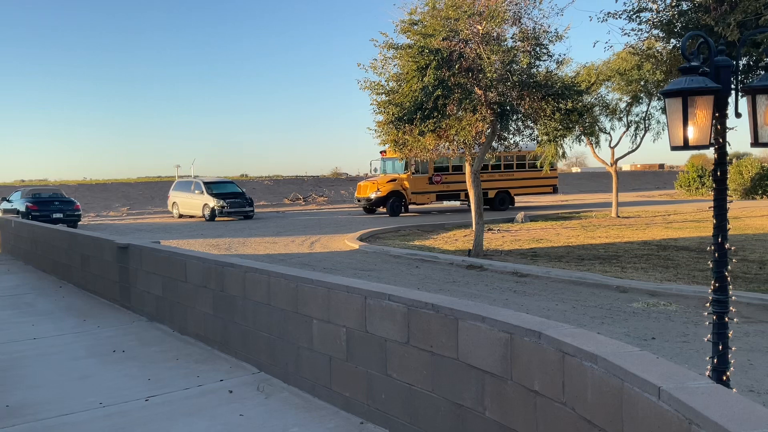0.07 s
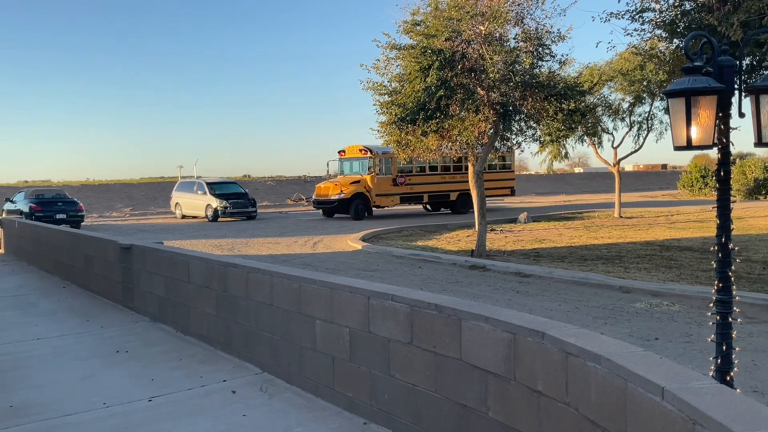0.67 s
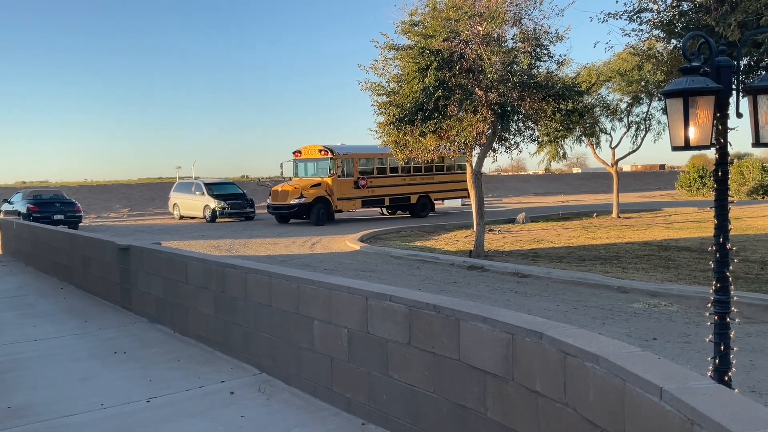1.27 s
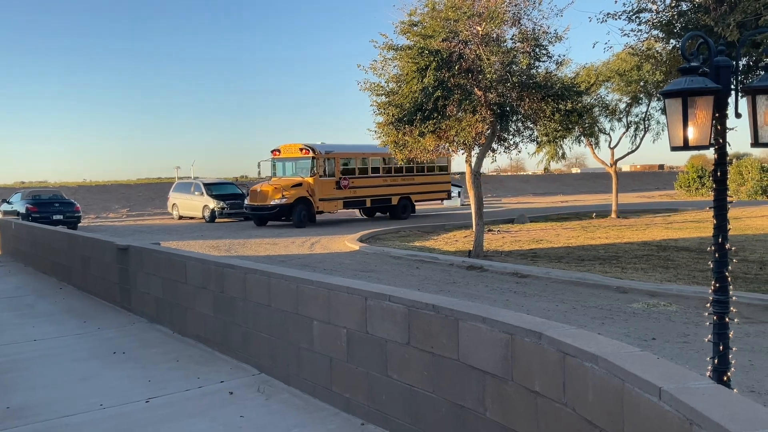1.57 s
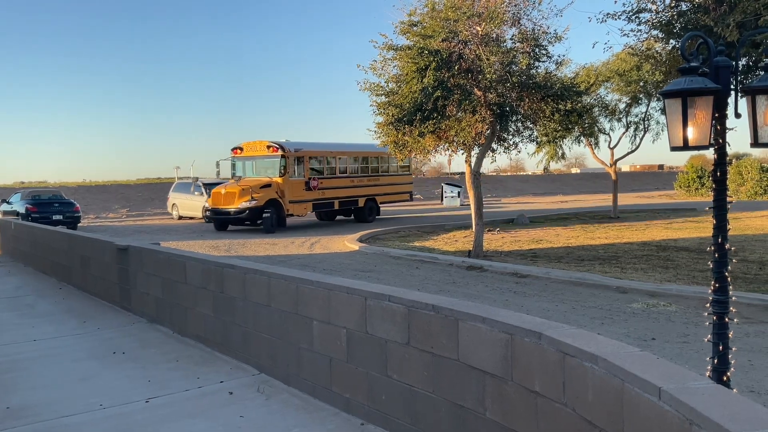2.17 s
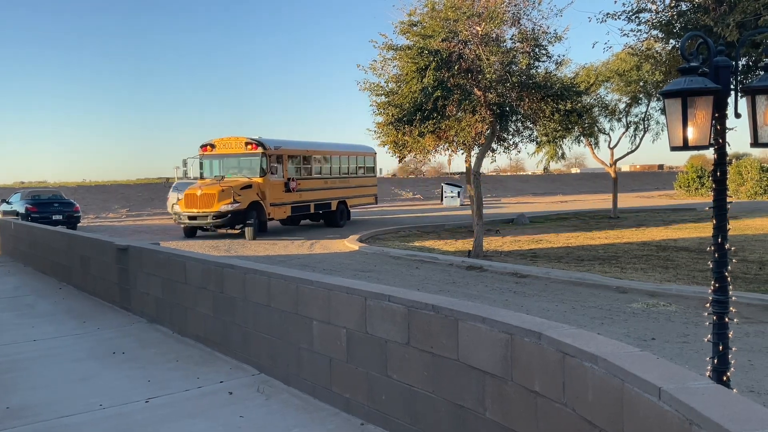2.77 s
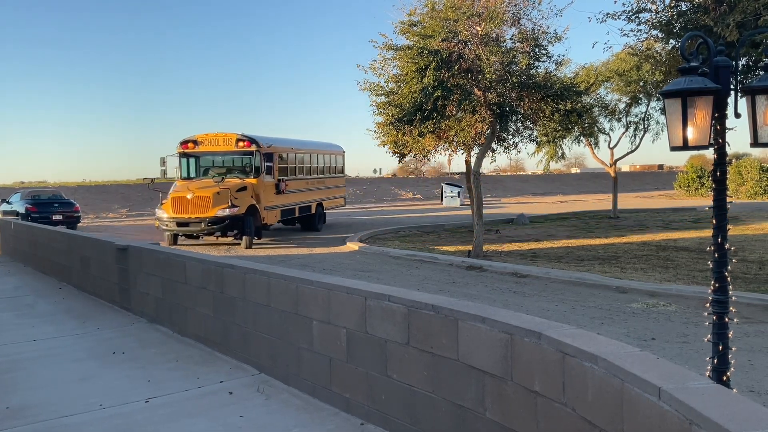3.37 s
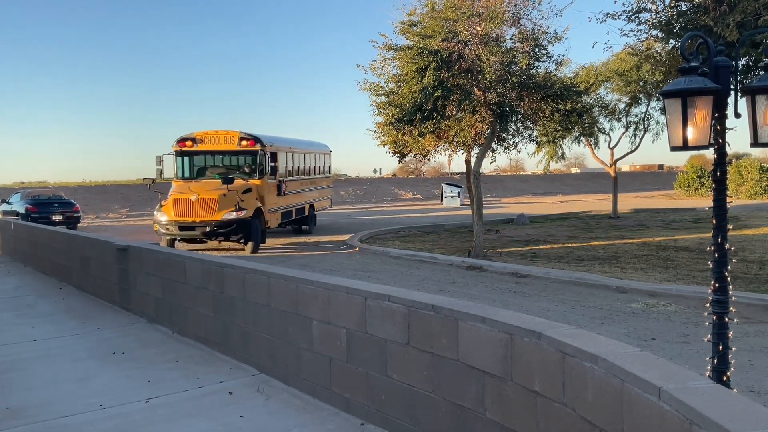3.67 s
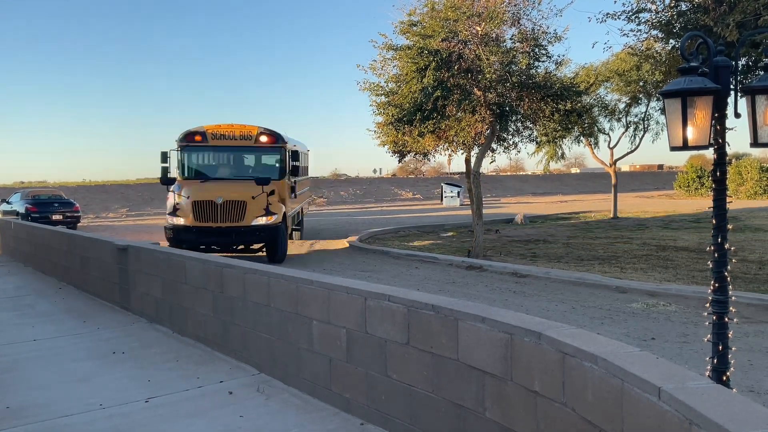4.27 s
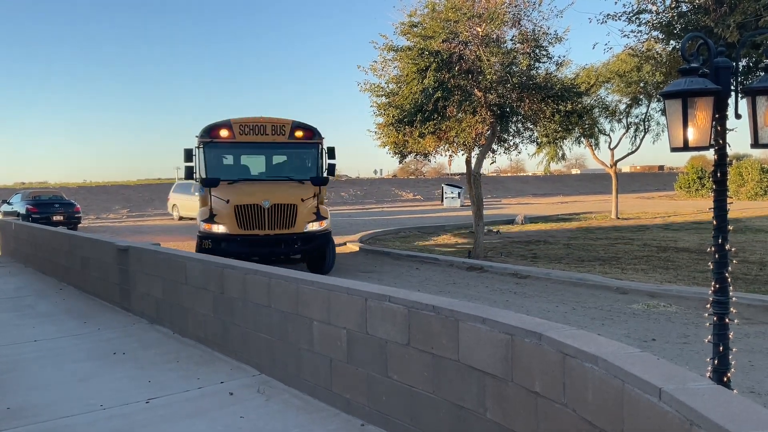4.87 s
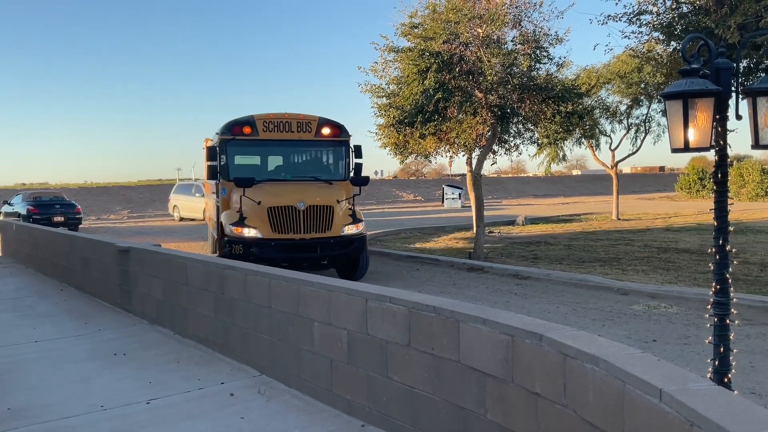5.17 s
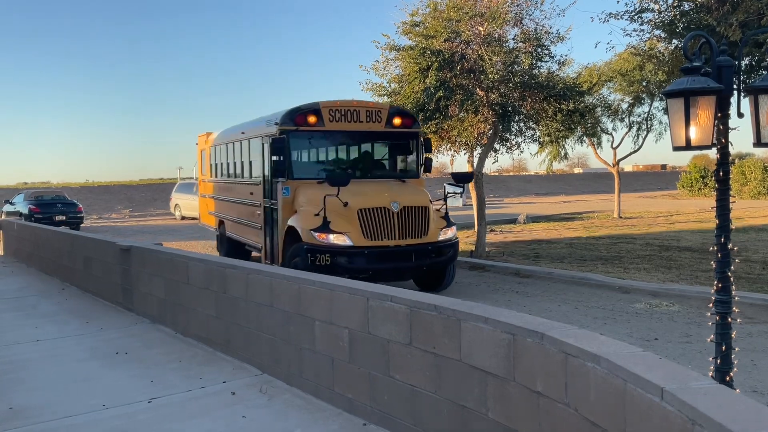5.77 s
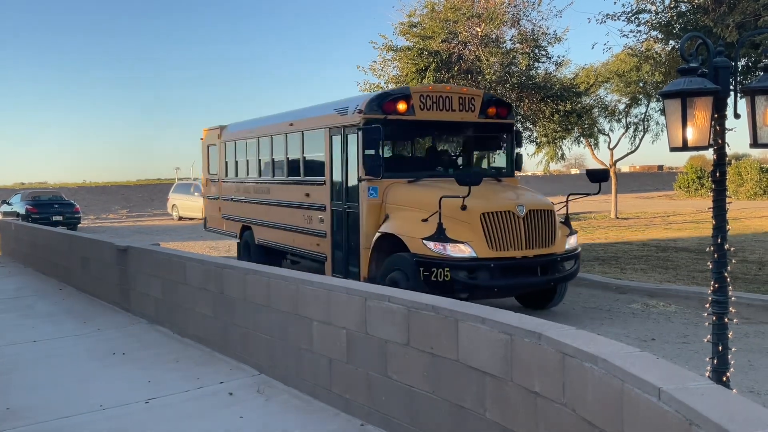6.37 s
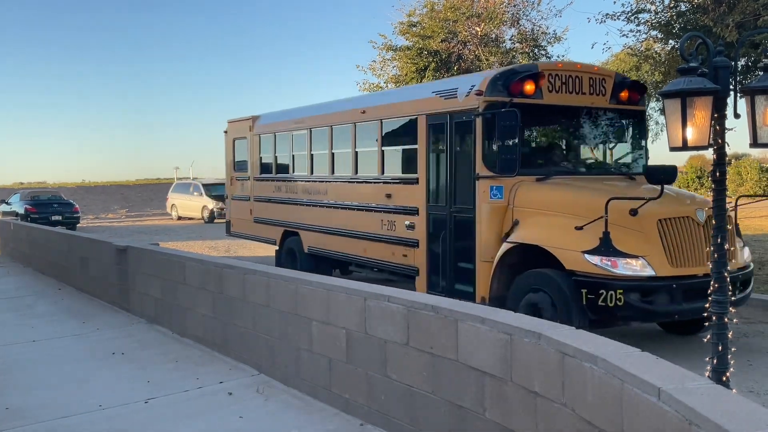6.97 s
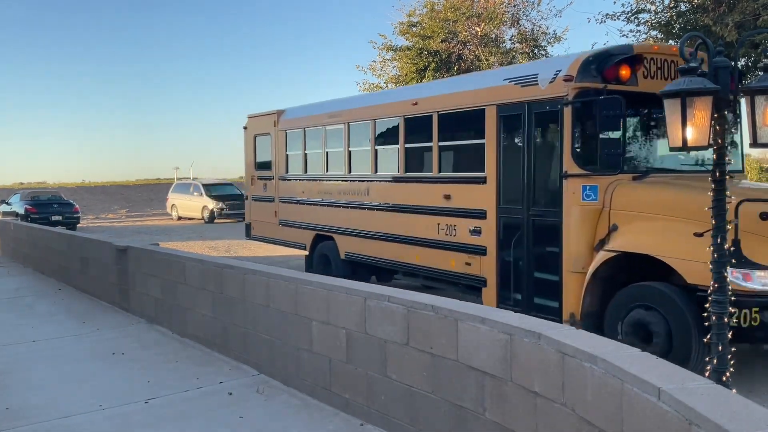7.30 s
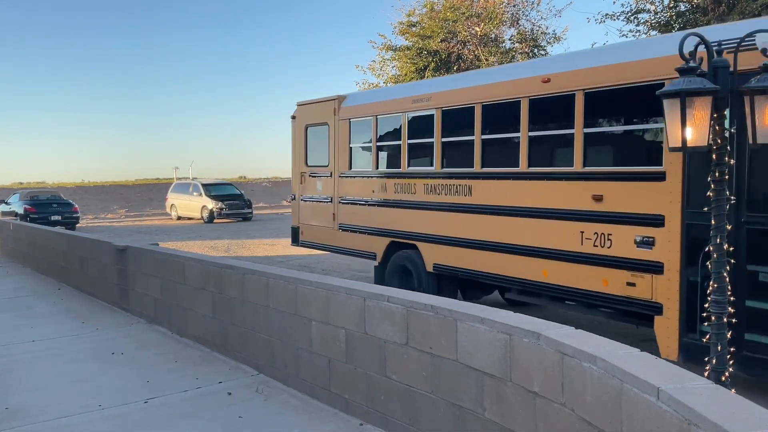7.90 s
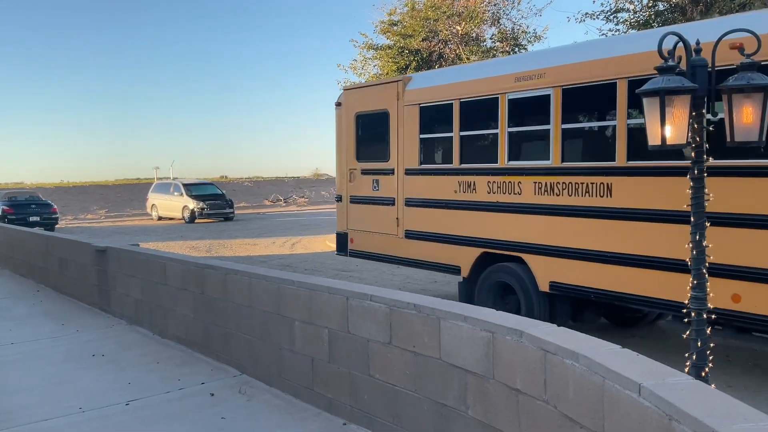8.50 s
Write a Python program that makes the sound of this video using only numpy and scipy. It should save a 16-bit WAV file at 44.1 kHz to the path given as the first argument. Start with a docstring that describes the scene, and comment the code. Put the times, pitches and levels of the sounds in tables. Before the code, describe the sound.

Heard from a fixed outdoor spot, a bus engine starts some way off, with an even diesel clatter, thin metallic pings and a rumbling exhaust. It rolls slowly nearer without revving. Midway the exhaust briefly surges and the knocking hardens. Then faint whines, a thin hiss, loose clanks and tiny snaps of grit join the swelling rattle as the bus passes a few metres from the stereo microphone.

```python
"""A six-cylinder diesel school bus rolls up a driveway at idle, passing 5.4 m from a stereo microphone pair.
Each firing knocks the block and rattles the injection gear, every second one rings the fuel pump; the exhaust
drones and rumbles underneath. Faint hums and gliding whines ride on the engine, loose fittings clank, a little
grit snaps under the tyres, and two moving ground-reflection notches hollow the sound."""
import sys
import numpy as np
from scipy import signal
from scipy.fft import rfft, irfft, next_fast_len
from scipy.io import wavfile

SR = 44100
rng = np.random.default_rng(int(sys.argv[2]) if len(sys.argv) > 2 else 0)


def transcribe(u):
    """Save the signal u as a 16-bit wav file named by the first command-line argument.

    u: samples, shape (n,) or (channels, n), limited to [-1, 1]; the rate is SR.
    q: integer samples, one column per channel.
    """
    v = np.clip(np.atleast_2d(u).T, -1, 1)
    q = np.round(v * 32767).astype(np.int16)
    wavfile.write(sys.argv[1], SR, q)


N = 381024
TIME = np.arange(N) / SR
SPEED_M_PER_S, NEAREST_M, NEAREST_S = 2.774, 5.38, 8.18   # the engine's pass by the microphones
TURN_START_S, TURN_END_S = 4.94, 8   # the bus swings from head-on to side-on

# cylinders in firing order: knock/dB, clatter/dB, pump/dB
CYLINDERS = [(-1.2, -.2, -1), (0, -1.3, -9), (-.5, 1.3, 0), (0, -.5, -8), (.5, 1.3, 0), (.5, -1.3, -9)]
KNOCK_DB, CLATTER_DB, PUMP_DB = np.transpose(CYLINDERS)


def combustion(crank, near_db, side, screen_db):
    """Each firing knocks the block, rings the housing and drums the body panels."""
    # resonances of each part: f/Hz, relative level/dB
    block_spectrum = [(600, -19), (780, -9.5), (860, -5), (1010, 3), (1130, 2), (1290, 2), (1420, 1),
                      (1600, -2), (2000, -2), (2300, -6), (2700, -5.5), (3600, -37.5)]
    housing_spectrum = [(420, -25.5), (510, -5.5), (570, 3), (630, 2.5), (740, 2), (850, -1), (1100, -34)]
    panel_spectrum = [(150, -23), (205, -0.5), (255, 1.5), (295, -1.5), (345, 0.5), (400, -1), (440, 2.5),
                      (490, 1.5), (580, -24.5)]
    thuds = firings(crank, KNOCK_DB, rise_s=.00038, decay_s=.0064, bed=.72,
                    uneven_db=.5, repeat=.53, grain_db=0)
    # close by, echoes from the road and the underbody fill the gaps between knocks
    knocks = firings(crank, KNOCK_DB, rise_s=.0016, decay_s=.011, bed=.4 + .04 * side,
                     uneven_db=.7, repeat=.4, grain_db=.5)
    recede_db = swell(at_s=5.4, half_s=.4, db=-1.7)   # while the hard knocks take over
    block = from_db(-28.5 + near_db + recede_db) * colour(knocks, block_spectrum)
    # the housing sounds forwards and fades once the nose has gone by
    gone_by_db = 2 * np.maximum(TIME - NEAREST_S, 0)
    housing_db = -35 + .84 * near_db - gone_by_db + screen_db / 2
    housing = from_db(housing_db) * colour(knocks + thuds, housing_spectrum)
    # the panels carry from afar, and drum louder side-on
    panels = from_db(-46 + 9 * side + screen_db / 2) * colour(thuds, panel_spectrum)
    return block + housing + panels


def valves(crank, near_db, screen_db):
    """The valves clatter as they seat, just ahead of each firing."""
    # valve gear resonances: f/Hz, relative level/dB
    spectrum = [(1700, -27), (2200, 2), (2650, 7), (3000, 3.5), (3400, -1.5), (3900, -15)]
    seatings = firings(crank + .09, KNOCK_DB, rise_s=.0075, decay_s=.0084, bed=.25,
                       uneven_db=1.8, repeat=.42, grain_db=1.2)
    return from_db(-32.5 + .95 * near_db + screen_db) * colour(seatings, spectrum)


def injectors(crank, near_db, side, screen_db):
    """The injection gear gives a bright rattle with each firing."""
    # injector resonances: f/Hz, relative level/dB
    spectrum = [(3000, -16), (3600, -2), (3980, 1), (4400, -0.5), (5200, -0.5), (5800, -3), (6250, -1.5),
                (6900, -9.5), (7800, -20)]
    rattle = firings(crank + .05, CLATTER_DB, rise_s=.006, decay_s=.013, bed=.2 + .02 * side,
                     uneven_db=1.1, repeat=.3, grain_db=.9)
    return from_db(-35.5 + .82 * near_db + screen_db) * colour(rattle, spectrum)


def fuel_pump(crank, near_db, side, screen_db):
    """The pump rings in narrow bands, tapped harder on every second firing."""
    # pump resonances: f/Hz, relative level/dB
    spectrum = [(3000, -25.5), (3700, -37), (3920, 19), (4060, -2), (4300, -2), (5000, -60), (5900, 11),
                (6250, -16), (6600, -26), (8000, -49)]
    taps = firings(crank - .02, PUMP_DB, rise_s=.0023, decay_s=.016, bed=.04 + .18 * side,
                   uneven_db=1, repeat=.19, grain_db=1.5)
    return from_db(-45.5 + .93 * near_db + screen_db) * colour(taps, spectrum)


def sizzle(crank, near_db):
    """A thin, flickering hiss swells as the engine nears the microphones."""
    # colour of the hiss: f/Hz, relative level/dB
    spectrum = [(6000, -12), (7400, 3), (8600, 0), (10000, -6), (11400, 1.5), (12500, 1), (14000, -3),
                (15500, -8)]
    hiss = firings(crank, CLATTER_DB, rise_s=.0022, decay_s=.0066, bed=1.1,
                   uneven_db=2, repeat=0, grain_db=2)
    return from_db(-53.5 + 1.2 * near_db + .94 * drift(21)) * colour(hiss, spectrum)


def hard_knocks():
    """Harder blows, single or in short runs, ring the modes of the block."""
    # blows: t/s, level/dB, run length/s
    blows = [(1.469, -32, 0), (4.975, -29.5, 0), (5.056, -21, 0), (5.113, -32, 0), (5.169, -27.5, 0),
             (5.226, -25, .12), (5.397, -24.5, .12), (5.568, -28, 0), (5.624, -26, .06), (5.736, -30, 0),
             (5.849, -28, .06), (5.969, -27, 0), (7.556, -19.5, 0), (7.762, -22, 0), (7.783, -22, 0),
             (7.873, -22.5, .06), (7.986, -21, .06), (8.101, -21, .06)]
    # block modes: f/Hz, relative level/dB, decay/s
    modes = [(880, -10, .004), (1190, -11, .006), (1275, 0, .0085), (1400, -10, .005), (1620, -11, .004),
             (2950, -11, .002), (4900, -12, .003)]
    return ring(runs(blows), modes)


def pump_pings(rise_s=.0025, decay_s=.015, detune=.014, uneven_db=1.5, gain_db=.8):
    """The pump and its pipes shiver briefly in clusters of close modes, a little different each time."""
    # louder pings: t/s, relative level/dB, run length/s
    pings = [(.238, -41, 0), (.318, -41, 0), (.509, -38.5, 0), (.57, -43, .12), (.793, -41.5, .06),
             (1.132, -41, 0), (1.187, -39, 0), (1.357, -38, 0), (1.47, -36, 0), (1.527, -40.5, .06),
             (1.64, -38, 0), (1.696, -41, 0), (1.752, -36, 0), (1.81, -35.5, 0), (1.866, -41.5, 0),
             (1.923, -38, .06), (2.047, -41, 0), (2.094, -37.5, 0), (2.266, -38, 0), (2.493, -39, 0),
             (2.604, -35.5, 0), (2.658, -35, 0), (2.893, -39, 0), (3.224, -41, 0), (3.339, -37, 0),
             (3.451, -35, 0), (3.794, -37, 0), (5.993, -33, 0), (6.333, -33, 0), (7.186, -30.5, .06),
             (7.355, -29.5, 0), (7.868, -30.5, 0), (8.152, -30.5, 0), (8.381, -28.5, 0), (8.553, -27.5, 0)]
    # mode clusters: f/Hz, width/Hz, relative level/dB
    bands = [(3200, 400, -11), (4010, 150, -2), (5200, 650, -9), (6170, 280, -5.5)]
    out, age = np.zeros(N + SR), TIME[:SR // 10]
    envelope = (1 - np.exp(-age / rise_s)) * np.exp(-age / decay_s)
    bins_hz = np.arange(len(age) // 2 + 1) * SR / len(age)
    hz, width_hz, band_db = np.transpose(bands)[:, :, None]
    for s, db in runs(pings):
        centre_hz = hz * (1 + detune * rng.standard_normal(hz.shape))
        phases = np.exp(2j * np.pi * rng.random((len(hz), len(bins_hz))))
        clusters = irfft(np.exp(-((bins_hz - centre_hz) / width_hz) ** 2) * phases, len(age))
        clusters /= clusters.std(axis=1, keepdims=True)
        strength = from_db(db + gain_db + band_db + uneven_db * rng.standard_normal(hz.shape))
        start = round(s * SR)
        out[start:start + len(age)] += (strength * clusters).sum(0) * envelope
    return direct_only(out[:N])


def exhaust(crank, near_db):
    """Low firing orders waver over a turbulent rumble and a boom that pulses with the firings."""
    # drone, shifting as the tailpipe turns: t/s, level of order 2/dB, level of order 4/dB
    drone_levels = [(0, -43.5, -50), (1.2, -43.5, -46.5), (2.5, -48.5, -41), (3.6, -40, -44),
                    (4.8, -44.5, -45), (6, -44.5, -44), (7.2, -47, -41.5), (7.8, -37.5, -45),
                    (8.64, -41, -54)]
    # boom, stronger once the bus has turned in: t/s, level/dB
    boom_levels = [(0, -47), (3.55, -45.5), (3.75, -40), (4.45, -41.5), (5.08, -47), (5.25, -38),
                   (5.75, -38), (6.1, -42), (6.6, -39), (8.64, -40)]
    # colours of rumble and boom: f/Hz, relative level/dB
    rumble_spectrum = [(25, -47), (30, -29), (35.5, 1), (43, -28), (55, 4.5), (68, 0), (85, -0.5), (118, 0),
                       (130, -3.5), (160, -3), (190, -8), (240, -23.5)]
    boom_spectrum = [(75, -17), (88, 2.5), (100, 0), (116, 2.5), (128, -1.5), (150, -17)]
    surge_db = swell(at_s=5.21, half_s=.055, db=6)
    second_db, fourth_db = in_time(drone_levels)
    drone = 0
    for order, db in (1, -48 + .33 * near_db), (2, second_db + surge_db), (4, fourth_db):
        amplitude = np.sqrt(2) * from_db(db + 2.56 * drift(2.5))
        drone += amplitude * np.sin(2 * np.pi * order * crank + .65 * drift(4.9))
    turbulence = rng.standard_normal((2, N))
    rumble = from_db(-36.5 + .23 * near_db + surge_db) * colour(turbulence, rumble_spectrum)
    puffs = rng.standard_normal((2, N)) * (1 + .98 * np.cos(2 * np.pi * crank))
    boom = from_db(in_time(boom_levels)[0]) * colour(puffs, boom_spectrum)
    return rumble + boom + direct_only(drone)


def hums(near_db):
    """Resonances grow with nearness and swell while the turning bus beams them at the microphones."""
    # resonances: f/Hz, width/Hz, steady share, base level/dB, share of the distance loss
    modes = [(321.5, 14.7, 0.44, -55.5, 0.0098), (349, 15, 0, -52.5, 0.77), (528.4, 6.7, 0.56, -49, 0.86),
             (649, 7, 0.85, -47.5, 0.36), (902, 48, 0.04, -44, 0.72), (1255, 31, 0, -40.5, 1.8)]
    # swells and dips of the hum within 6 % of f: f/Hz, t/s, half length/s, gain/dB
    beams = [(320, 1.85, .25, 6), (320, 3.05, .75, 9), (320, 4.35, .3, 5.5), (320, 8.2, 1.25, 18.5),
             (352, 7.04, 0.63, 12.5), (529, 4.5, 0.39, 3), (652, .2, .8, -9), (652, 4.2, 0.55, 6),
             (652, 5.03, 0.33, 8.5), (652, 6.3, 0.4, 6.5), (652, 7.5, 0.27, 12.5), (652, 8.45, .2, 5),
             (890, 2.3, 0.78, 4.5)]
    out = 0
    for hz, width_hz, steady, db, loss_share in modes:
        beam_db = sum(swell(*beam) for beam_hz, *beam in beams if abs(beam_hz / hz - 1) < .06)
        out += resonance(hz, width_hz, steady, db + loss_share * near_db + beam_db)
    return out


def whines(steady=.12):
    """Narrow whines swell, glide and fade as the engine comes by."""
    # whines: t/s, half length/s, f/Hz, glide/(Hz/s), width/Hz, level/dB
    glides = [(4.602, 0.74, 855, -10, 28, -43), (6.76, 0.2, 896, 20.5, 29, -37),
              (6.8, 0.25, 933, 30.5, 24, -43), (6.851, 0.4, 1295, -79.5, 22, -38.5),
              (7.419, 0.27, 846, -100, 100, -37.5), (7.468, 0.14, 1232, 189.5, 7.6, -34.5),
              (7.85, 0.24, 995, 90.5, 47, -36), (8.15, 0.25, 1176, 10, 13, -39),
              (8.15, 0.25, 1287, 12.5, 18, -37.5)]
    out = 0
    for s, half_s, hz, hz_per_s, width_hz, db in glides:
        envelope = np.exp(-.5 * ((TIME - s) / half_s) ** 2)
        out += envelope * resonance(hz + hz_per_s * (TIME - s), width_hz, steady, db)
    return out


def clanks():
    """Loose fittings of the body each ring at their own pitch; the first blow is a lower-pitched knock of the
    engine."""
    # blows: t/s, level/dB, f/Hz
    blows = [(1.805, -27.5, 900), (5.677, -24.5, 2950), (6.328, -24.5, 1530), (7.61, -25, 1750),
             (8.495, -27, 2800)]
    # modes of each blow: ratio to its pitch, relative level/dB, decay/s
    modes = [(.55, -9, .004), (.97, -1, .006), (1.03, -2, .006), (1.38, -11, .004), (1.7, -11, .004)]
    return sum(ring([(s, db)], np.multiply(modes, [hz, 1, 1])) for s, db, hz in blows)


def tyre_grit(band_hz=(6000, 15000), decay_s=.0007, gain_db=6):
    """Grit snaps under the tyres in tiny bursts of treble noise."""
    # snaps: t/s, relative peak level/dB
    snaps = [(6.6104, -28.5), (7.7578, -42), (8.0132, -35), (8.5145, -36.5)]
    out, age = np.zeros(N + SR), TIME[:SR // 20]
    band = signal.butter(2, band_hz, "band", fs=SR, output="sos")
    for s, db in snaps:
        burst = signal.sosfilt(band, rng.standard_normal(len(age)) * np.exp(-age / decay_s))
        start = round(s * SR)
        out[start:start + len(age)] += from_db(db + gain_db) * burst / np.abs(burst).max()
    return direct_only(out[:N])


def spectral_dips(hz, s):
    """Gain by frequency and time: the bounce off the driveway cancels two bands that move with the bus, and the
    band around 1.75 kHz sinks while the nose swings by, then returns when the wheel arch opens."""
    # dips: t/s, f/Hz, depth/dB (negative is a lift)
    low_dip = [(0, 980, 10), (1.4, 990, 7), (2.1, 1010, 4), (4, 1020, 1), (5.1, 1050, 4), (5.8, 1060, 5.5),
               (6.6, 1050, 1.5), (7.4, 1110, -1), (8.64, 1130, -2.5)]
    mid_dip = [(0, 1750, 1.5), (2, 1750, 1.5), (5.6, 1730, -0.5), (6.3, 1750, 1), (7.45, 1750, 4),
               (7.65, 1750, 0), (8.64, 1750, -3)]
    high_dip = [(0, 2360, 3), (2, 2540, 5), (3.7, 2530, 10), (5.3, 2500, 5), (6.2, 2270, 3),
                (6.85, 2240, 7), (7.3, 2180, 6), (7.9, 2280, -2), (8.64, 2430, 0)]
    gain = 1
    for dip, width_hz in (low_dip, 75), (mid_dip, 350), (high_dip, 146):
        centre_hz, depth_db = in_time(dip, s)
        gain *= from_db(-depth_db * np.exp(-((hz[:, None] - centre_hz) / width_hz) ** 2))
    return gain


def microphones(sound):
    """Direct sound reaches the right microphone first; scattered sound makes the sides less alike."""
    # the pair: f/Hz, likeness 0-1, left phase lead far/rad, close/rad, L-R far/dB, close/dB
    pair = [(130, 1.0, 0.0, 0.0, -0.1, -0.2), (320, 0.91, -0.2, -0.8, 2.3, 2.0),
            (500, 0.85, -0.0, -0.9, -2.1, -3.3), (700, 0.89, 0.9, -0.6, 1.1, 0.4),
            (920, 0.8, 0.7, -0.3, -0.4, -5.9), (1300, 0.94, 0.1, -0.4, 1.1, -2.9),
            (1750, 0.91, -1.6, -1.4, -0.5, -0.8), (2400, 0.91, -2.8, -3.3, -1.3, -0.0),
            (3300, 0.9, -5.5, -5.9, -0.9, -1.1), (4200, 1.0, -6.3, -6.3, 0.0, 0.1),
            (6200, 0.93, -7.2, -7.2, -0.3, -0.5), (7500, 0.66, -8.0, -8.1, -0.8, -0.6),
            (9500, 0.9, -9.3, -9.3, 0, 0), (11500, 0.8, -10.6, -10.6, 0, 0),
            (13200, 0.95, -12.4, -12.4, 0, 0)]
    hz, s, spectra = signal.stft(sound, SR, nperseg=1024)
    direct, scattered = spectra * spectral_dips(hz, s)
    pair_hz, *columns = np.transpose(pair)
    alike, phase_far, phase_close, pan_far, pan_close = [np.interp(hz, pair_hz, c)[:, None]
                                                         for c in columns]
    side = side_on(s)
    phase = phase_far + side * (phase_close - phase_far)
    pan_db = pan_far + side * (pan_close - pan_far)
    lean = from_db(pan_db / 2) * np.exp(.5j * phase)
    shared = np.sqrt((1 + alike) / 2) * direct
    apart = np.sqrt((1 - alike) / 2) * scattered
    return signal.istft([(shared + apart) * lean, (shared - apart) / lean], SR)[1][:, :N]


def firings(crank, cylinder_db, rise_s, decay_s, bed, uneven_db, repeat, grain_db):
    """A burst of rattling at each firing, over a steady bed; rows are direct and scattered sound."""
    stroke = np.floor(crank).astype(int)
    cylinder = stroke % len(cylinder_db)
    age_s = (crank - stroke) / (np.gradient(crank) * SR)
    strength = from_db(cylinder_db[cylinder] + uneven_db * rng.standard_normal(1024)[stroke])
    burst = strength * (1 - np.exp(-age_s / rise_s)) * np.exp(-age_s / decay_s)
    # each cylinder shakes the same parts in the same order, so a share of its rattle repeats
    habit = rng.standard_normal((2, len(cylinder_db), SR // 10))[:, cylinder, (age_s * SR).astype(int)]
    fresh = rng.standard_normal((2, N)) * rms_one(from_db(grain_db * drift(93)))
    return (np.sqrt(repeat) * habit + np.sqrt(1 - repeat) * fresh) * np.hypot(burst, bed)


def runs(rows, repeat_s=2 / 35.35, uneven_db=1):
    """Blows as (t/s, level/dB), coming back on every second firing while their run lasts."""
    return [(s + k * repeat_s, db + (k > 0) * uneven_db * rng.standard_normal())
            for s, db, length_s in rows for k in range(1 + int(length_s / repeat_s))]


def ring(blows, modes, uneven_db=1, detune=.012, attack_s=.0012):
    """Each blow sets every mode ringing, with a strength, phase and slight detuning of its own."""
    out, age = np.zeros(N + SR), TIME[:SR // 10]
    hz, mode_db, decay_s = np.transpose(modes)[:, :, None]
    for s, db in blows:
        strength = from_db(db + mode_db + uneven_db * rng.standard_normal(hz.shape))
        pitch = hz * (1 + detune * rng.standard_normal(hz.shape))
        tones = np.sin(2 * np.pi * (pitch * age + rng.random(hz.shape))) * np.exp(-age / decay_s)
        start = round(s * SR)
        out[start:start + len(age)] += (strength * tones).sum(0) * np.minimum(age / attack_s, 1)
    return direct_only(out[:N])


def resonance(hz, width_hz, steady, level_db):
    """A narrow mode kept ringing by the engine: part steady tone, part random shaking."""
    phase = 2 * np.pi * np.cumsum(hz * np.ones(N)) / SR
    cos, sin = np.cos(phase), np.sin(phase)
    shaken = rms_one(np.array([drift(width_hz) * cos + drift(width_hz) * sin for _ in range(2)]))
    tone = direct_only(np.sqrt(2) * np.sin(phase + 1.32 * drift(1.15)))
    return from_db(level_db) * (np.sqrt(steady) * tone + np.sqrt(1 - steady) * shaken)


def colour(x, spectrum, skirt_db_per_octave=30):
    """Pass x through a causal body with this spectrum, falling steeply past its ends; rms 1."""
    size = next_fast_len(N + SR // 2, True)
    hz, db = np.transpose(spectrum)
    octaves, points = np.log2(np.arange(size // 2 + 1) * SR / size + 1), np.log2(hz)
    outside = np.abs(octaves - np.clip(octaves, points[0], points[-1]))
    gain_db = np.interp(octaves, points, db) - skirt_db_per_octave * np.minimum(outside, 2)
    cepstrum = irfft(np.log(from_db(gain_db)), size)
    cepstrum[1:size // 2] *= 2   # folded onto positive time: minimum phase
    cepstrum[size // 2 + 1:] = 0
    return rms_one(irfft(rfft(x, size) * np.exp(rfft(cepstrum)), size)[..., :N])


def drift(rate_hz, hop=40, settle=2000):
    """Random wander of rms 1, smoothed above rate_hz."""
    pole = np.exp(-2 * np.pi * rate_hz * hop / SR)
    noise = rng.standard_normal(N // hop + settle + 2)
    slow = signal.lfilter([1], [1, -2 * pole, pole * pole], noise)[settle:]
    return np.interp(np.arange(N) / hop, np.arange(len(slow)), rms_one(slow))


def side_on(s):
    """How far the bus has turned its side to the microphones, 0-1."""
    return np.clip((s - TURN_START_S) / (TURN_END_S - TURN_START_S), 0, 1)


def swell(at_s, half_s, db):
    """A bell-shaped swell or dip of level, in dB."""
    return db * np.exp(-((TIME - at_s) / half_s) ** 2)


def in_time(rows, at_s=TIME):
    """The columns of a curve at the given times."""
    s, *columns = np.transpose(rows)
    return [np.interp(at_s, s, c) for c in columns]


def direct_only(x):
    """Put x in the direct row and leave the scattered row silent."""
    return x * [[1], [0]]


def from_db(db):
    """Decibels to gain."""
    return 10 ** (np.asarray(db) / 20)


def rms_one(x):
    """Scale to rms 1."""
    return x / np.sqrt(np.mean(x ** 2) + 1e-20)


def scene():
    """One crankshaft drives the engine and exhaust as the bus comes up from 23 m away."""
    # an almost even idle: t/s, firing rate/Hz
    idle = [(0, 35.75), (1.2, 35.3), (3.4, 35.36), (4.1, 35.72), (4.8, 35.39), (6.2, 35.2), (8.64, 35.08)]
    crank = -.11 + np.cumsum(in_time(idle)[0]) / SR   # counted in firings
    distance_m = np.hypot(NEAREST_M, SPEED_M_PER_S * (TIME - NEAREST_S))
    near_db = 20 * np.log10(NEAREST_M / distance_m)   # spreading loss; each part takes its own share
    side = side_on(TIME)
    # head-on, the bonnet screens the clatter, and the lower parts half as much
    screen_db = swell(at_s=4.3, half_s=.75, db=-2.1)
    engine = combustion(crank, near_db, side, screen_db) + valves(crank, near_db, screen_db)
    engine += injectors(crank, near_db, side, screen_db) + fuel_pump(crank, near_db, side, screen_db)
    engine += sizzle(crank, near_db) + hard_knocks() + pump_pings()
    background = tyre_grit() + hums(near_db) + whines() + clanks()
    return microphones(engine + exhaust(crank, near_db) + background)


def record(dry, cutoff_hz=15500):
    """The recorder cuts the top steeply."""
    return signal.sosfilt(signal.ellip(14, .1, 80, cutoff_hz, fs=SR, output="sos"), dry)


dry = scene()
out = record(dry)
transcribe(out)
```